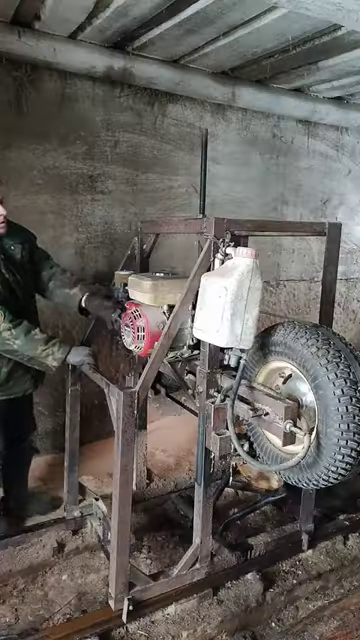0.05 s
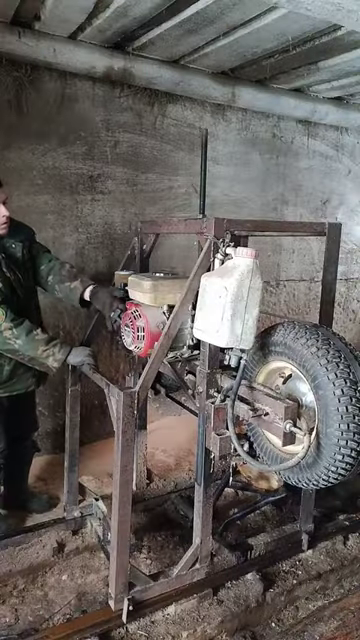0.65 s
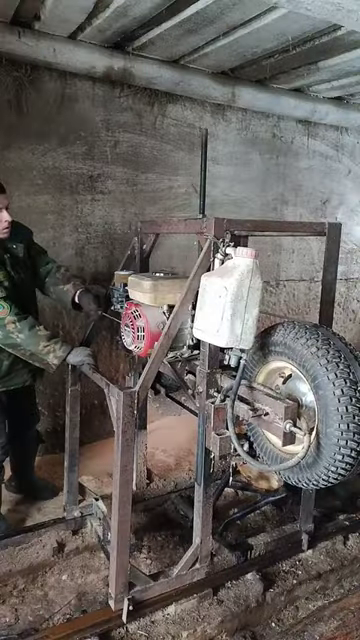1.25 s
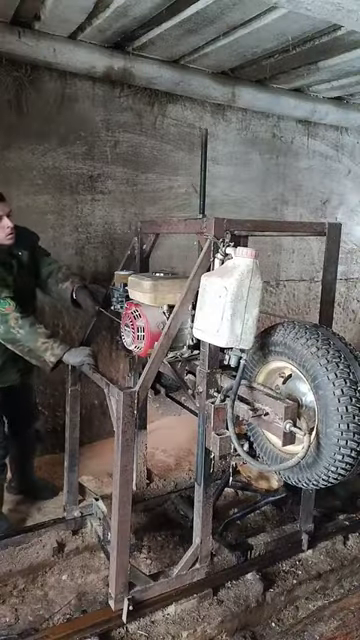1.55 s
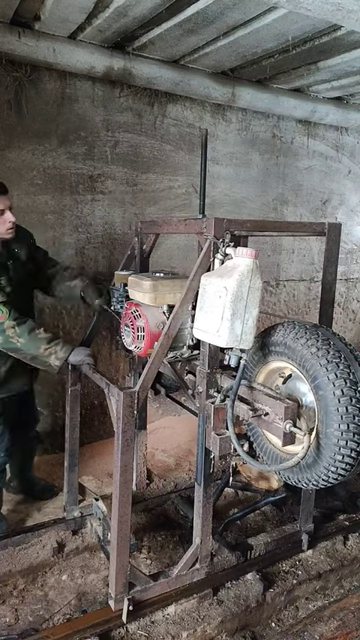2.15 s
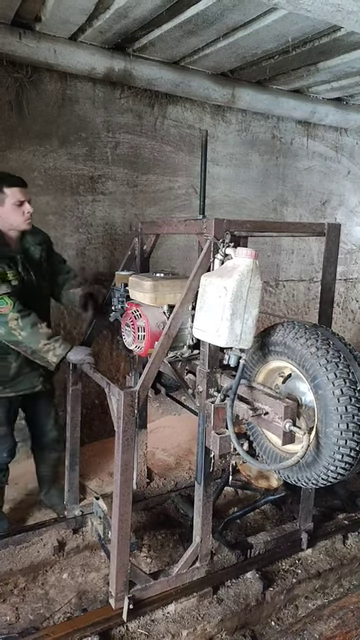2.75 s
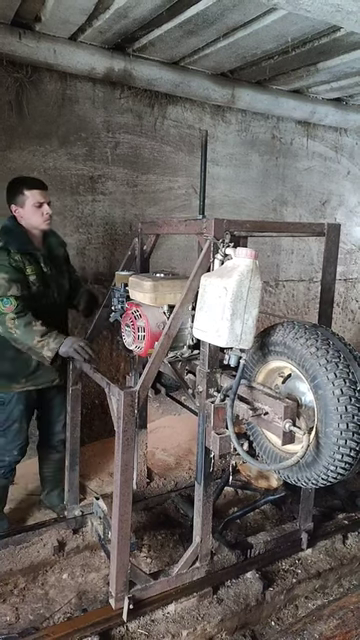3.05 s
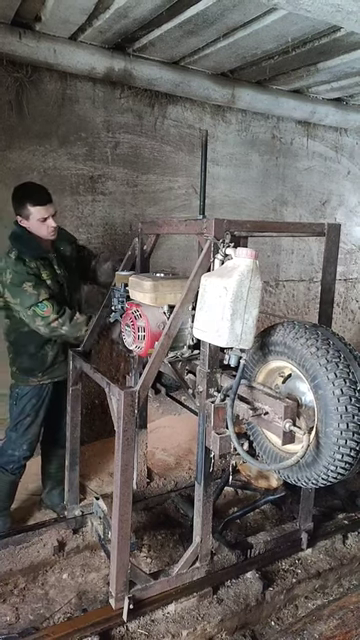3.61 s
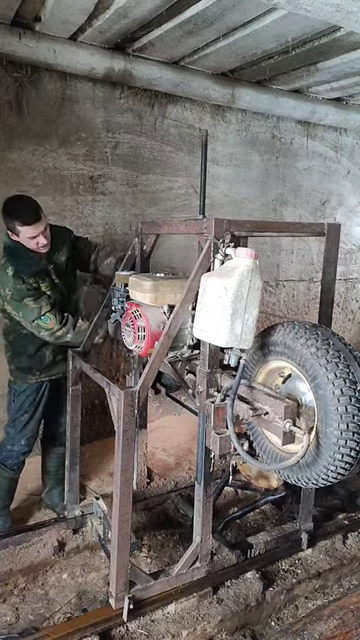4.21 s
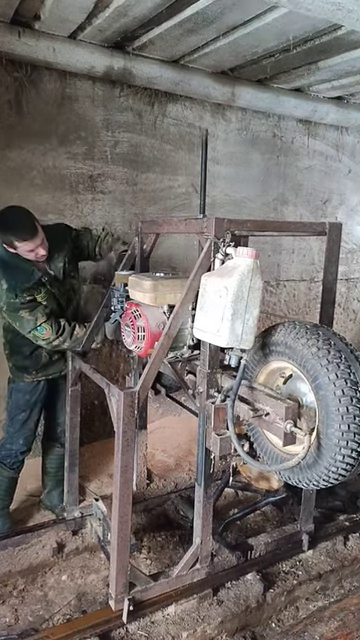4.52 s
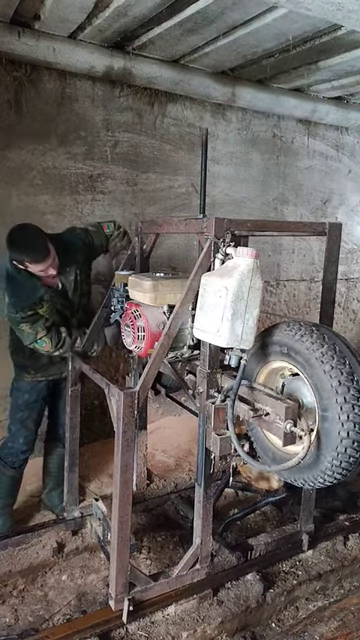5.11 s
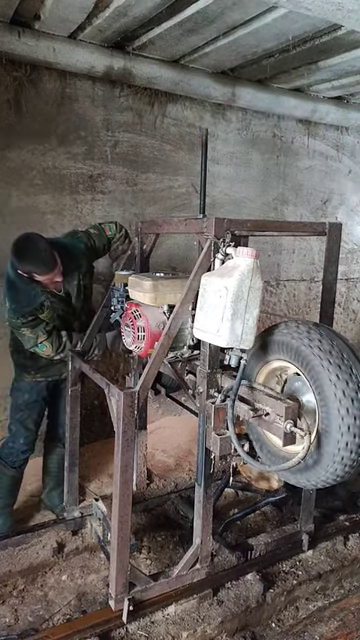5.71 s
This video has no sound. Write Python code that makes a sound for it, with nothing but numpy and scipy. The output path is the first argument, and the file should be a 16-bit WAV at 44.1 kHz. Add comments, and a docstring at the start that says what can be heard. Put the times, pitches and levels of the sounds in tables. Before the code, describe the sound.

A small petrol engine is pull-started, catches with metal clanks and settles into a steady rattling drone in a concrete shed.

```python
"""A home-made band sawmill in a concrete shed, heard in stereo from a hand-held camera.
First the hush of the shed, with fingers rumbling right at the microphones and a sleeve rustling.
At 1.1 s the starter rope is taken up, at 1.7 s pulled: it rasps, pawls click, the engine pumps air.
At 2 s the single-cylinder four-stroke catches with a honk, barks and shakes the steel frame into clanks.
From 2.7 s it drones steadily; from 4.9 s it is throttled back until it knocks once a cycle."""
import sys
import numpy as np
from scipy import signal
from scipy.fft import rfft, irfft, next_fast_len
from scipy.io import wavfile

SR = 44100
rng = np.random.default_rng(int(sys.argv[2]) if len(sys.argv) > 2 else 0)


def to_wav(s):
    """Save 16-bit WAV."""
    ch = np.atleast_2d(s).T  # columns
    pcm = np.round(np.clip(ch, -1, 1) * 32767)  # PCM
    wavfile.write(sys.argv[1], SR, pcm.astype(np.int16))


N = 258867
TIME = np.arange(N) / SR


def amp(db):
    """Decibels to gain."""
    return 10 ** (np.asarray(db) / 20)


def unit(x):
    """Scales to rms 1."""
    return x / np.sqrt(np.mean(x ** 2) + 1e-20)


def curve(rows):
    """(time, value) rows joined by straight lines."""
    return np.interp(TIME, *np.transpose(rows))


def spectrum_at(points, hz):
    """(frequency, value) rows joined by straight lines in log frequency."""
    f, value = np.transpose(points)
    return np.interp(np.log(hz + 1), np.log(f + 1), value)


def swell(s, half):
    """A smooth hump of peak 1 centred on s."""
    return np.exp(-np.minimum(((TIME - s) / half) ** 2, 50))


def burst(s, decay):
    """An envelope that rises quickly to nearly 1 at s and dies away."""
    age = np.clip((TIME - s) / decay, 0, 50)
    return 2 * (np.exp(-age) - np.exp(-4 * age))


def wander(hz, hop=32):
    """Random drift of rms 1, up to about the given rate."""
    size = next_fast_len(N // hop + 2)
    f = np.fft.rfftfreq(size, hop / SR)
    slow = unit(irfft(rfft(rng.standard_normal(size)) / (1 + (f / hz) ** 4), size))
    return np.interp(np.arange(N) / hop, np.arange(size), slow)


def grit(per_s, spread_db):
    """Dense tiny contacts of uneven size, rms 1."""
    sizes = amp(spread_db * np.minimum(rng.exponential(1, N), 4))
    return unit(rng.standard_normal(N) * sizes * (rng.random(N) < per_s / SR))


def fluttering(turns, rough, flutter_hz, alike=0.51):
    """A tone of rms 1 whose strength and phase flutter, only partly alike at the two microphones."""
    angle = 2 * np.pi * (turns + rng.random())
    cos, sin = np.cos(angle), np.sin(angle)
    shared, *own = (wander(flutter_hz) * cos + wander(flutter_hz) * sin for _ in range(3))
    flutter = np.sqrt(alike) * shared + np.sqrt(1 - alike) * np.array(own)
    return (np.sqrt(2) * cos + rough * flutter) / np.hypot(1, rough)


def colour(x, spectrum, peaks=(), size=4096):
    """Causal filter of unit energy: a broad spectrum lifted at its resonances."""
    hz = abs(np.fft.fftfreq(size, 1 / SR))
    lifts = sum(lift / (1 + (2 * (hz - f) / width) ** 2) for f, width, lift in peaks)
    log_gain = np.log(amp(spectrum_at(spectrum, hz) + lifts))
    response = np.fft.ifft(np.exp(np.conj(signal.hilbert(log_gain)))).real  # minimum phase
    return signal.oaconvolve(x, response / np.linalg.norm(response))[:N]


def filtered(x, gain):
    """Applies a gain that is a function of frequency, without delay."""
    size = next_fast_len(N + SR // 4)
    return irfft(rfft(x, size) * gain(np.fft.rfftfreq(size, 1 / SR)), size)[..., :N]


def treble(x, hz):
    """The part of a sound above hz."""
    return filtered(x, lambda f: 1 - 1 / (1 + (f / hz) ** 4))


# room tone of the shed: (frequency [Hz], level [dB])
HUSH_COLOUR = [(30, -1), (150, 4), (350, 5), (900, -0.5), (2000, -6), (5000, -14), (7000, -13),
               (10000, -19), (14500, -19)]
# its strength: (time [s], level [dB])
HUSH_LEVEL = [(0, -65.5), (.3, -66.5), (.45, -71), (1.0, -70.5), (1.5, -69.5), (1.7, -63), (5.87, -57)]
def room_tone():
    """The faint hush of the shed, unrelated at the two microphones."""
    hush = np.array([colour(rng.standard_normal(N), HUSH_COLOUR) for _ in range(2)])
    return hush * amp(curve(HUSH_LEVEL))


# fingers shifting on the camera: (time [s], half length [s], left level [dB], right level [dB])
FINGER_RUBS = [(.09, 0.064, -47, -65), (0.258, 0.059, -48.5, -58), (0.435, 0.048, -62, -41),
               (0.559, 0.059, -60, -35.5), (.85, 0.15, -64, -60), (1.056, 0.088, -58, -52),
               (1.318, 0.065, -60, -35), (1.53, 0.13, -64, -36), (1.74, .03, -50, -42),
               (1.875, 0.06, -41, -34)]
# a light grip, then a firm rub: (frequency [Hz], level [dB])
GRIP_COLOUR = [(10, -9), (30, 4.5), (60, -7.5), (100, -22), (150, -40), (250, -56), (600, -68), (2000, -71)]
RUB_COLOUR = [(30, -15), (70, 1), (125, -3), (180, -16.5), (260, -26), (600, -53), (2000, -66)]
# soft bumps by the right microphone: (time [s], level [dB], frequency [Hz], decay [s])
CAMERA_BUMPS = [(0.216, -44, 427, 0.0031), (.537, -45, 170, 0.0055), (.566, -21.5, 70, 0.007),
                (1.303, -28.5, 135, 0.0089), (1.628, -28.5, 55, 0.015), (1.84, -34, 125, 0.019),
                (1.88, -34, 135, 0.013)]
# tiny ticks of clothing: (time [s], level [dB])
CLOTHING_TICKS = [(.023, -60), (.217, -65), (.776, -70), (1.331, -55)]
def handling(grip_db=-60.5, firm_db=-42, rub_db=-4, rumble_db=-3, bump_left_db=-22, tick_s=0.0017):
    """Fingers right at the microphones: a rumble that brightens with pressure and soft bumps; faint ticks of
    clothing."""
    def rumble(pressure):
        firmness = np.minimum(pressure / amp(firm_db), 1)
        rub = colour(rng.standard_normal(N), RUB_COLOUR) * amp(rub_db) * firmness
        return (colour(rng.standard_normal(N), GRIP_COLOUR) + rub) * amp(rumble_db) * pressure
    bumps = sum(amp(db) * burst(s, decay) * np.sin(2 * np.pi * hz * (TIME - s))
                for s, db, hz, decay in CAMERA_BUMPS)
    shifts = sum(amp([[left], [right]]) * swell(s, half) for s, half, left, right in FINGER_RUBS)
    ticks = sum(amp(db) * burst(s, tick_s) for s, db in CLOTHING_TICKS) * rng.standard_normal(N)
    rumbles = np.array([rumble(amp(grip_db) + shift) for shift in shifts])
    return rumbles + bumps * amp([[bump_left_db], [0]]) + ticks


# rustles of a sleeve: (time [s], half length [s], level [dB])
SLEEVE_RUSTLES = [(.03, .03, -73), (0.133, .05, -68.5), (.3, .04, -74), (0.582, .03, -70), (1.6, .05, -73)]
# its cloth: (frequency [Hz], level [dB])
CLOTH_COLOUR = [(200, 2), (1500, 2), (3500, -3), (5400, -3), (7000, -11), (14000, -16)]
def sleeve():
    """Cloth brushes on cloth as the arm moves."""
    brushing = sum(amp(db) * swell(s, half) for s, half, db in SLEEVE_RUSTLES)
    return colour(grit(2500, 3) * brushing, CLOTH_COLOUR)


def pull(start, full, let_go, rise_db_per_s=181, fade_db_per_s=330):
    """Envelope of a pull: the rope gathers speed, runs, and slows when let go."""
    rise_db = -rise_db_per_s * np.maximum(full - TIME, 0)
    fade_db = -fade_db_per_s * np.clip(TIME - let_go, 0, 1)
    return (TIME >= start) * amp(rise_db + fade_db)


# pulls of the rope: (start [s], at full speed [s], let go [s], level [dB])
ROPE_PULLS = [(1.06, 1.187, 1.216, -36), (1.7, 1.813, 2.0, -34)]
# handle and pawls click, the handle knocks dully once more, then a short hiss comes just before the first
# firing (last row): # (time [s], dull level [dB], bright level [dB], bright decay [s])
CLICKS_AND_HISS = [(1.07, -49, -48, 0.0076), (1.095, -56, -51, .006), (1.136, -40, -31.5, 0.0041),
                   (1.181, -45, -23.5, 0.0036), (1.186, -42, -29, 0.003), (1.69, -42.5, -57, .005),
                   (1.789, -46, -31, 0.01), (1.799, -43, -27.5, 0.009), (1.958, -31, -30.5, .012),
                   (1.983, -48, -23.5, .008)]
# the rope's rasp, then the dull and bright parts of clicks and hiss: (frequency [Hz], level [dB])
ROPE_COLOUR = [(100, -24), (230, -2.5), (350, 0), (560, 5.5), (800, 0.5), (1500, -2.5), (3000, -4.5),
               (5000, -8), (7000, -7), (9800, -16.5), (14000, -10.5)]
DULL_COLOUR = [(100, -8), (330, -2), (600, 3), (900, -8), (2600, -4), (4500, -25), (12000, -40)]
BRIGHT_COLOUR = [(200, -6.5), (700, -0.5), (1800, -4), (3500, 0), (5500, -2.5), (7200, -0.5), (9800, -12.5),
                 (12000, -3.5), (14500, -10)]
# resonances of the starter housing: (frequency [Hz], width [Hz], lift [dB])
HOUSING_PEAKS = [(344, 60, 3), (954, 80, 4.5), (1430, 140, 3), (1620, 130, 3.5), (2800, 600, 0),
                 (6900, 700, 2.5)]
def starter(dull_s=0.0082, hiss_hz=4500, slow_hiss_share=0.62):
    """The rope rasps in its guide, brighter when fast; handle and pawls click; a short hiss follows."""
    rope = sum(amp(db) * pull(start, full, let_go) for start, full, let_go, db in ROPE_PULLS)
    rasp = colour(grit(7000, 1.6) * rope, ROPE_COLOUR, HOUSING_PEAKS)
    rasp -= (1 - slow_hiss_share) * (1 - rope / rope.max()) * treble(rasp, hiss_hz)
    dull_bursts = sum(amp(db) * burst(s, dull_s) for s, db, _, _ in CLICKS_AND_HISS)
    dull = colour(dull_bursts * rng.standard_normal(N), DULL_COLOUR, HOUSING_PEAKS)
    bright_bursts = sum(amp(db) * burst(s, decay) for s, _, db, decay in CLICKS_AND_HISS)
    return rasp + dull + colour(bright_bursts * grit(8000, 1.2), BRIGHT_COLOUR)


# pumped air: (time [s], half length [s], level [dB], frequency [Hz], roughness [ratio], flutter [Hz])
AIR_MOANS = [(1.097, .028, -52, 688, 2.7, 61), (1.196, 0.071, -44.5, 650, 2.5, 65),
             (1.817, 0.028, -36.5, 558, 0.34, 18), (1.91, 0.086, -44, 532, 1.1, 27)]
def moans():
    """Turned over by the rope, the engine pumps air: hoarse at first, then a lower, clearer hoot."""
    return sum(amp(db) * swell(s, half) * fluttering(hz * TIME, rough, flutter_hz)
               for s, half, db, hz, rough, flutter_hz in AIR_MOANS)


# the engine runs up, holds and slows: (time [s], firing rate [Hz])
FIRING_RATE = [(1.995, 7.33), (2.3, 15.5), (2.5, 17.45), (2.68, 20.25), (3.6, 20.42), (4.6, 20.22),
               (4.85, 20.27), (5.0, 19.65), (5.6, 17.76), (5.87, 17.51)]
CATCH_S = FIRING_RATE[0][0]
def cycles():
    """Four-stroke cycles done since the first firing; the crank turns twice for each."""
    return np.cumsum(curve(FIRING_RATE) * (TIME >= CATCH_S)) / SR


def stroke(turn, start, decay):
    """A puff at the same point of every cycle once the engine fires; start and decay in cycles."""
    return np.exp(-((turn - start) % 1) / decay) * (turn > 0)


# closing of the throttle: (time [s], share shut [0-1])
THROTTLE_SHUT = [(4.9, 0.1), (5.3, 1)]
def throttled(open_db, shut_db):
    """A gain that slides between two levels as the throttle shuts."""
    return amp(open_db + curve(THROTTLE_SHUT) * (shut_db - open_db))


# the engine picks up: (time [s], level [dB])
PICKUP_LEVEL = [(1.97, -60), (2.0, -1), (2.09, -5), (2.15, -1.5), (2.35, 0), (2.55, -2), (2.7, 1)]
# heavy firings, while catching and when the governor opens up: (time [s], level [dB])
HEAVY_FIRINGS = [(2.137, -34), (2.211, -21.5), (2.345, -31), (2.41, -32), (2.468, -19), (2.527, -29),
                 (2.58, -20), (2.68, -20), (2.735, -27), (2.788, -27), (2.89, -25), (3.183, -22),
                 (3.276, -20.5), (4.163, -23), (4.263, -25), (4.355, -24), (4.601, -23)]
# loose parts rattle a little more or less: (time [s], level [dB])
LOOSE_LEVEL = [(2.6, -29.5), (3.3, -28.5), (3.75, -30.5), (4.5, -28), (5.0, -30), (5.87, -29)]
# engine body, loose parts and low thud: (frequency [Hz], level [dB])
BODY_COLOUR = [(60, -26.5), (130, -16.5), (250, -7), (420, -5), (560, -4), (760, -3), (950, -4.5),
               (1500, -9), (2200, -9), (4000, -21.5), (9000, -35.5)]
RATTLE_COLOUR = [(500, -27), (1500, -4), (2500, -2), (3500, 1), (5000, -2.5), (6200, -1), (7000, 2),
                 (8000, -5), (9800, -9.5), (12000, -6), (14500, -13.5)]
THUD_COLOUR = [(15, -16), (35, 0), (58, 1), (85, -2.5), (150, -5), (300, -11.5), (600, -32.5), (2000, -92)]
# resonances of the casing, then of the loose guards and tank: (frequency [Hz], width [Hz], lift [dB])
CASING_PEAKS = [(550, 60, 6), (626, 27, 2.5), (945, 52, 7), (1264, 25, 5), (1887, 27, 2.5), (2084, 35, 3),
                (7060, 910, 2.5)]
GUARD_PEAKS = [(2038, 36, 8), (2400, 50, 4), (2746, 50, 4), (2930, 55, 7), (3538, 57, 6.5),
               (6750, 190, 4.5), (8620, 600, 3), (13400, 900, 3.5)]
PUSH_S = 0.01  # half length of a heavy firing's exhaust push
def engine(turn, uneven_db=2.5, body_db=-23.5, thud_db=-40, heavy_db=-6.5, thud_s=0.017):
    """Each cycle a firing knock, an exhaust puff and two valve slaps stir the casing, over fan rush."""
    strength = amp(uneven_db * rng.uniform(-1.3, 1, 200))[turn.astype(int)]
    knock = strength * throttled(open_db=-2.5, shut_db=7) * stroke(turn, 0, 0.08)
    exhaust = strength * stroke(turn, .2, 0.19)
    valves = stroke(turn, .76, 0.065) + 0.53 * stroke(turn, .55, 0.055)
    body = unit(rng.standard_normal(N) * (0.65 + knock + 0.9 * exhaust + 0.65 * valves))
    shaking = 0.72 + 1.8 * knock + 0.091 * exhaust + 1.4 * valves
    rattle = unit(grit(6000, 3.7) * shaking * amp(0.2 * wander(60)))
    heavy = sum(amp(db) * burst(s - PUSH_S, thud_s) for s, db in HEAVY_FIRINGS)
    thud = rng.standard_normal(N) * (amp(thud_db) * (0.95 + exhaust) + amp(heavy_db) * heavy)
    sound = colour(body * amp(body_db) * throttled(open_db=0, shut_db=-3), BODY_COLOUR, CASING_PEAKS)
    sound += colour(rattle * amp(curve(LOOSE_LEVEL)), RATTLE_COLOUR, GUARD_PEAKS)
    sound += colour(thud, THUD_COLOUR)
    return sound * amp(curve(PICKUP_LEVEL))


# resonances of the muffler: (frequency [Hz], throttle open level [dB], throttle shut level [dB])
MUFFLER_TONES = [(553, -39, -50), (625, -42.5, -45), (945, -43, -47), (1258, -46, -54)]
def muffler_notes(turn, rough=1.3, flutter_hz=11):
    """The train of exhaust strokes keeps the muffler's resonances throbbing."""
    throb = unit(1 + 1.2 * stroke(turn, start=.2, decay=0.27)) * amp(curve(PICKUP_LEVEL))
    return throb * sum(throttled(open_db, shut_db) * fluttering(hz * TIME, rough, flutter_hz, alike=.4)
                       for hz, open_db, shut_db in MUFFLER_TONES)


# the first firing honks through the muffler: (frequency [Hz], level [dB])
HONK_TONES = [(624, -24.5), (905, -25.5), (947, -25), (1240, -40)]
def honk(start_s=1.992, end_s=2.062, rise_s=0.0038, fade_s=0.019, rough=.65, flutter_hz=42):
    """The first slow exhaust stroke holds the muffler's resonances until the valve closes."""
    held = np.clip((TIME - start_s) / rise_s, 0, 1) * np.exp(-np.clip(TIME - end_s, 0, 1) / fade_s)
    return held * sum(amp(db) * fluttering(hz * TIME, rough, flutter_hz) for hz, db in HONK_TONES)


# blows in the shaken mill: (time [s], clash level [dB], treble lift [dB], ring level [dB], decay [s])
STEEL_BLOWS = [(1.993, -15, -9, -7.5, 0.0059), (2.105, -11, -10, -11, 0.0059),
               (2.113, -7.5, -11, -13, .0055), (2.126, -20, 4, -11, 0.012), (2.162, -22, -3, -9, 0.0048),
               (2.19, -15, 0, -12, .013), (2.204, -16, -2.5, -17, 0.011), (2.314, -18, -9, -28, 0.0079),
               (2.327, -16, 1, -24, 0.0065), (2.332, -11, 2.5, -30, 0.0032), (2.349, -13, -7, -31, 0.0042),
               (2.445, -16.5, 3, -25, 0.0086), (2.453, -10, -1, -19, 0.0052), (2.468, -22, 7, -26, 0.0084),
               (2.552, -19, 1, -14.5, 0.01), (2.563, -15, 3, -12, .011), (2.578, -19, -1, -17, .006),
               (2.614, -31, 0, -23, .0043), (2.72, -13, 1, -16, 0.0026), (3.212, -16.5, 0, -28, 0.0048),
               (3.751, -29, -3, -32, .0025), (4.19, -17.5, -4, -28, 0.0045), (4.442, -16, -18, -30, 0.0052),
               (4.678, -23, -5, -30, .0069), (4.739, -17, -3, -28, .003), (4.788, -22, -2, -30, 0.0026),
               (4.837, -17, -2, -28, 0.0028), (5.142, -18, 3.5, -30, .003), (5.189, -19, -3, -22, .003),
               (5.242, -18, 2.5, -31, 0.0042), (5.351, -14, -1.5, -32, 0.0036),
               (5.402, -18, -8, -31, 0.0038), (5.516, -13.5, 0.5, -20, 0.004),
               (5.573, -8, -0.5, -16, 0.002), (5.629, -19, 1, -28, .003), (5.796, -15.5, 3, -21, .0052),
               (5.853, -15.5, 3.5, -28, 0.0041)]
# steel clashing on steel: (frequency [Hz], level [dB])
CLASH_COLOUR = [(100, -21.5), (400, -2), (800, 0.5), (2000, 2), (3500, -2), (5000, -5.5), (7200, -3),
                (9800, -13.5), (12000, -7.5), (14500, -13)]
# modes of the steel frame: (frequency [Hz], level [dB], t60 [s])
FRAME_MODES = [(322, -9.5, 0.087), (461, -10, 0.1), (538, -1.5, 0.11), (578, 1, 0.067), (627, 2, 0.15),
               (709, -4, 0.062), (869, 2.5, 0.096), (920, -2, 0.08), (962, -1.5, 0.4), (1218, -11, 0.13),
               (1855, -12, 0.079), (2300, -23, 0.096)]
def clanks(clash_db=2, ring_db=-9.0, detune=0.014, crisp_hz=5060):
    """Loose steel parts chatter briefly at each blow and set the frame ringing, never twice alike."""
    hz, mode_db, t60 = np.transpose(FRAME_MODES)[:, :, None]
    t = TIME[:SR // 4]
    fade = amp(mode_db) * np.exp(-np.log(1000) * t / t60) * (1 - np.exp(-t / 0.00038))
    contacts = grit(14000, 1.3)
    chatter, crisp, ring = np.zeros(N), np.zeros(N), np.zeros(N + len(t))
    for s, db, treble_db, frame_db, decay in STEEL_BLOWS:
        blow = amp(db) * burst(s, decay)
        chatter += blow
        crisp += (amp(treble_db) - 1) * blow
        shift, phase = rng.uniform(-1.1, 1, (2, len(FRAME_MODES), 1))
        modes = fade * np.sin(2 * np.pi * hz * (1 + detune * shift) * t + np.pi * phase)
        ring[round(s * SR):][:len(t)] += amp(frame_db) * modes.sum(0)
    clash = colour(chatter * contacts + treble(crisp * contacts, crisp_hz), CLASH_COLOUR, CASING_PEAKS)
    return amp(clash_db) * clash + amp(ring_db) * ring[:N]


# strong orders swell as the speed passes resonances of mount and pipe:
# (firing rate [Hz], crank shake [dB], exhaust boom [dB], then its three overtones [dB])
STRONG_ORDERS = [(10, -50, -45, -41, -53, -55), (15.2, -35, -38, -29, -48, -48),
                 (17.93, -31, -36, -35, -46, -48), (18.34, -42, -30.5, -44, -50, -50),
                 (19, -35, -30, -28, -46, -46), (18.9, -38, -28.5, -33, -37, -44),
                 (19.77, -39, -29.5, -32, -42, -30.5), (19.76, -39, -31, -47, -48, -33.5),
                 (20.46, -42.5, -29.5, -44, -54, -41)]
def drone(turn, orders=(2, 5, 6, 7, 8), regular_s=2.68, early_db=-7, upset_db=-5.5, uneven_db=1.0):
    """Crank shake and exhaust boom: tones on multiples of the firing rate, as loud as the speed sets."""
    def tone(order):
        return np.sqrt(2) * np.cos(2 * np.pi * (order * turn + rng.random()))
    rates, *levels = np.transpose(STRONG_ORDERS)
    crank, boom, *overtones = (amp(np.interp(curve(FIRING_RATE), rates, db)) * tone(order)
                               for db, order in zip(levels, orders))
    # the boom builds once the firing is regular, and dips at each heavy firing
    early = .5 - .5 * np.tanh((TIME - regular_s) / 0.044)
    upset = np.minimum(sum(swell(s, half=0.032) for s, _ in HEAVY_FIRINGS), 1)
    pipe = amp(early_db * early) * (boom * amp(upset_db * upset) + sum(overtones))
    return (crank + pipe) * amp(uneven_db * wander(10)) * (TIME >= CATCH_S)


# weak orders: (order, rounded for pitch [x firing rate], throttle open level [dB], shut level [dB])
WEAK_ORDERS = [(3, -66, -56), (4, -54, -47), (9, -72, -44.5), (10, -51, -51), (11, -42, -46),
               (11.96, -42.5, -48), (13, -47.5, -54), (14, -45, -36), (16, -41.5, -55.5), (16.9, -47, -43),
               (18, -47.5, -42), (19, -44.5, -48), (22, -49.5, -47), (23, -42, -49.5), (26, -46, -60),
               (28, -39.5, -64), (31, -45, -44.5), (31.9, -47, -44), (38, -59, -43), (40, -69, -42)]
def hum(turn, waver=0.042, flutter_hz=6):
    """The engine's weaker orders, wavering more the higher they lie."""
    tones = sum(throttled(open_db, shut_db)
                * fluttering(round(order) * turn, waver * order, flutter_hz, alike=0.83)
                for order, open_db, shut_db in WEAK_ORDERS)
    return amp(2 * curve(PICKUP_LEVEL)) * tones


def exhaust_pushes(turn, labour_hz=19, labour_db=-29, at_cycles=0.15, width_cycles=0.11):
    """A heavy firing shoves out a slug of gas, a low pulse; throttled below labour_hz, every one does."""
    heavy = sum(amp(db) * (.5 * swell(s, 2 * PUSH_S) - swell(s, PUSH_S)) for s, db in HEAVY_FIRINGS)
    offset = (turn - at_cycles + .5) % 1 - .5
    slug = np.exp(-(offset / width_cycles) ** 2)
    slow = .5 + .5 * np.tanh((labour_hz - curve(FIRING_RATE)) / .5)
    labour = curve(THROTTLE_SHUT) * (TIME > THROTTLE_SHUT[0][0]) * slow
    return heavy + amp(labour_db) * labour * (slug.mean() - slug)


# barks at the muffler: (time [s], gust level [dB], ring level [dB], decay [s])
MUFFLER_BARKS = [(2.204, -31, -25, 0.036), (2.318, -29, -23, 0.025), (2.561, -23, -21, 0.016),
                 (2.605, -30, -24, .012), (2.68, -23, -40, .012), (2.721, -12.5, -34, 0.0073),
                 (2.735, -16.5, -25, 0.012), (2.777, -21, -34, 0.0081), (3.274, -27, -29, 0.02),
                 (4.202, -26, -30, 0.02), (4.266, -27, -34, .02), (4.678, -21, -18, 0.02),
                 (4.786, -30, -22.5, .018), (4.835, -30, -28, 0.015), (5.576, -21.5, -29, 0.013),
                 (5.798, -26, -24.5, 0.015)]
# their gusts: (frequency [Hz], level [dB])
GUST_COLOUR = [(50, -16), (130, -4), (280, -2.5), (420, -2.5), (570, 2.5), (720, 0), (900, -17),
               (2000, -35), (6000, -55)]
def barks():
    """A rich charge leaves the muffler as a short, hollow gust."""
    gusts = sum(amp(db) * burst(s, decay) for s, db, _, decay in MUFFLER_BARKS)
    return colour(gusts * rng.standard_normal(N), GUST_COLOUR)


def muffler_ring(hz=565.6, rough=0.89, flutter_hz=30):
    """Each gust sets the muffler ringing on one unsteady note."""
    ringing = sum(amp(db) * burst(s, decay) for s, _, db, decay in MUFFLER_BARKS)
    return ringing * fluttering(hz * TIME, rough, flutter_hz)


# reverberation of the concrete shed: (frequency [Hz], t60 [s])
WALL_T60 = [(100, 2.3), (500, 0.45), (2000, 0.35), (6000, 0.27), (14000, 0.18)]
def walls(x, size=22000, spacing=12, near_db=-3.5, near_s=0.007):
    """One random pattern of dense wall echoes, unrelated at the two microphones."""
    taps = np.zeros((2, size))
    arrivals = np.arange(5 * spacing, size - spacing, spacing)
    arrivals = arrivals + rng.integers(0, spacing, (2, len(arrivals)))
    np.put_along_axis(taps, arrivals, rng.choice([-1., 1.], arrivals.shape), 1)
    hz, t, spectra = signal.stft(taps, SR, nperseg=256)
    fade = amp(-60 * t / spectrum_at(WALL_T60, hz)[:, None])
    fade *= 1 + amp(near_db) * np.exp(-t / near_s)  # floor and nearest wall thicken the first echoes
    fade /= np.sqrt(np.mean(fade ** 2, 1, keepdims=True) * size / spacing)
    echo = signal.istft(spectra * fade, SR, nperseg=256)[1]
    return signal.oaconvolve(x[None], echo, axes=1)[:, :N]


# balance where the camera is held: (frequency [Hz], echo over direct sound [dB])
ECHO_BALANCE = [(40, -19), (120, -9), (250, -4.5), (500, 1), (1000, 11), (4000, 7), (14000, 19.5)]
def shed(x, turn, patterns=4):
    """Direct sound plus several echo patterns, cross-faded each cycle to keep the reverb diffuse."""
    def direct(hz):
        return 1 / np.sqrt(1 + amp(spectrum_at(ECHO_BALANCE, hz)) ** 2)
    shares = [np.sqrt(2 / patterns) * np.cos(2 * np.pi * (k // 2 + 1) * turn + k * np.pi / 2)
              for k in range(patterns)]
    echoes = sum(walls(x * share) for share in shares)
    return filtered(x, direct) + filtered(echoes, lambda hz: np.sqrt(1 - direct(hz) ** 2))


def scene():
    """The mill echoes round the shed; hollow notes, drone and pushes reach the microphones directly."""
    turn = cycles()
    echoing = sleeve() + starter() + engine(turn) + clanks() + barks()
    hollow = moans() + muffler_notes(turn) + honk() + muffler_ring()
    direct = hollow + drone(turn) + hum(turn) + exhaust_pushes(turn)
    return room_tone() + handling() + shed(echoing, turn) + direct


# the camera's microphone ports: (frequency [Hz], left minus right [dB])
PORT_BALANCE = [(60, 1.3), (160, 0), (450, -1), (750, 0), (1200, 1.5), (2000, 0), (3300, -0.7),
                (5400, -2.5), (7000, -4.5), (9000, 4.5), (14000, -3)]
def record(dry, ceiling=.9, edge_hz=14350):
    """Each microphone port colours the sound its own way; peaks are rounded and the top is cut off."""
    heard = filtered(dry, lambda hz: amp(np.outer([.5, -.5], spectrum_at(PORT_BALANCE, hz))))
    rounded = heard / (1 + (heard / ceiling) ** 6) ** (1 / 6)
    lowpass = signal.firwin(401, edge_hz, window=("kaiser", 9), fs=SR)
    return signal.oaconvolve(rounded, lowpass[None], "same")


dry = scene()
out = record(dry)
to_wav(out)
```